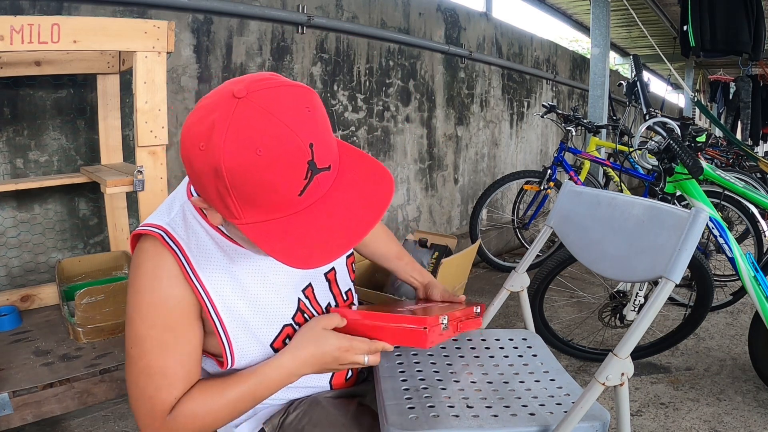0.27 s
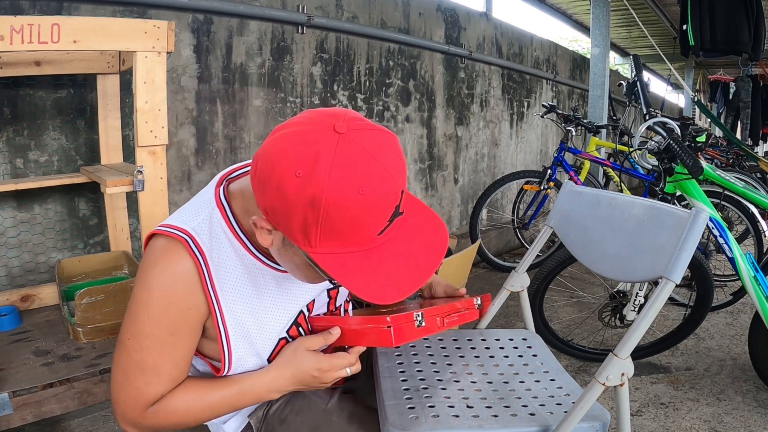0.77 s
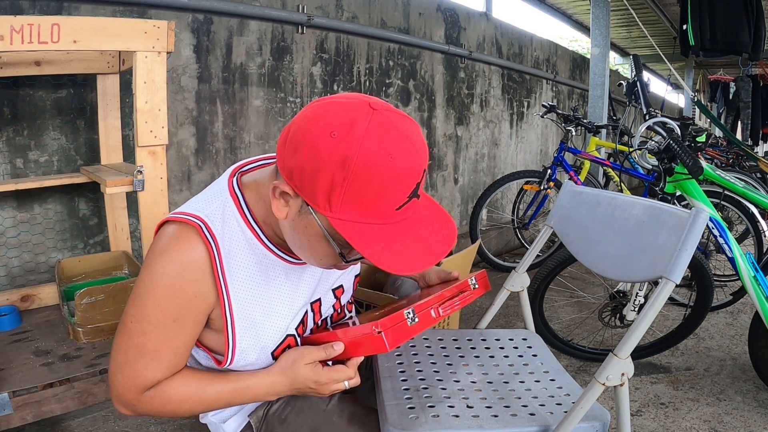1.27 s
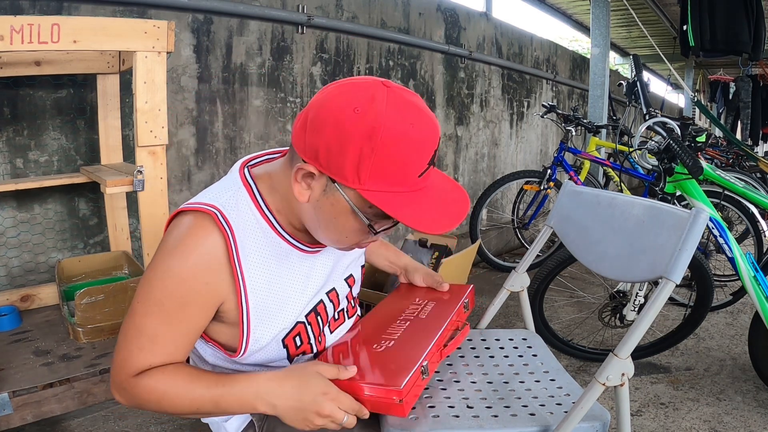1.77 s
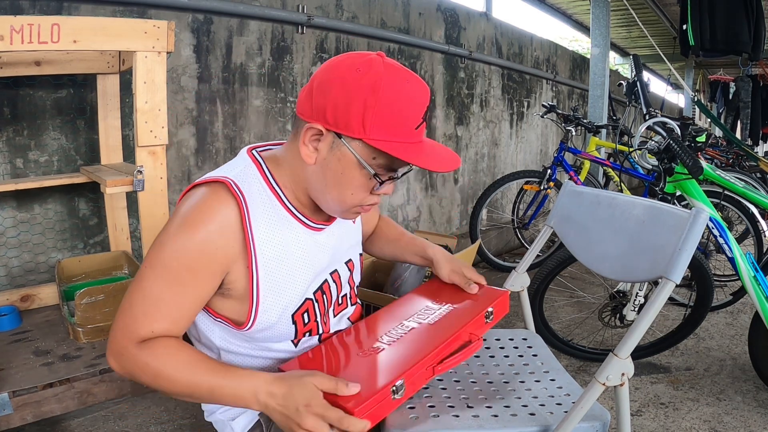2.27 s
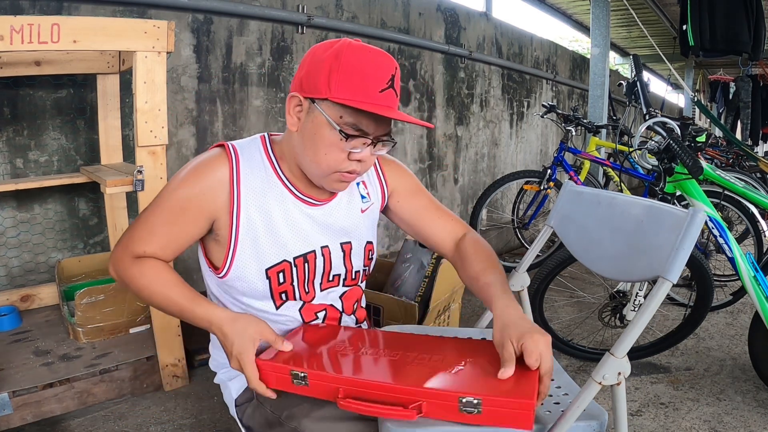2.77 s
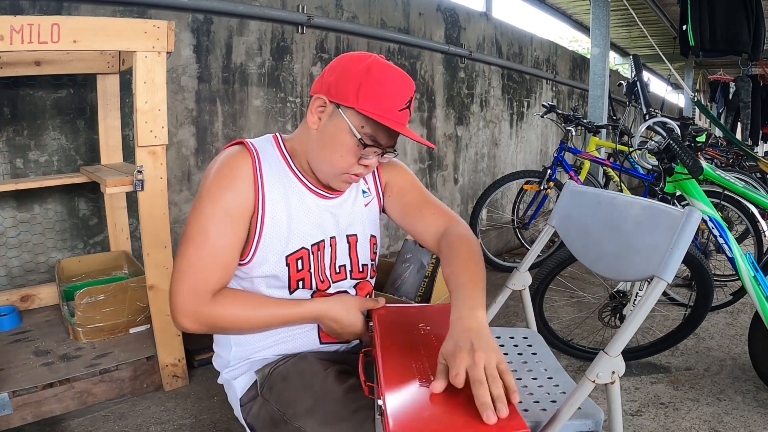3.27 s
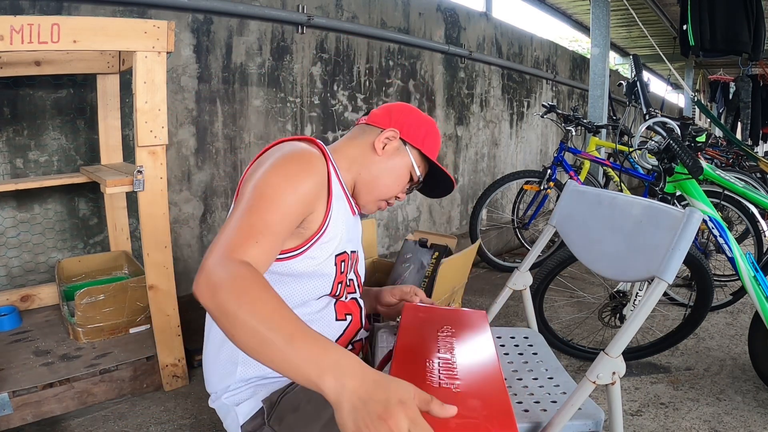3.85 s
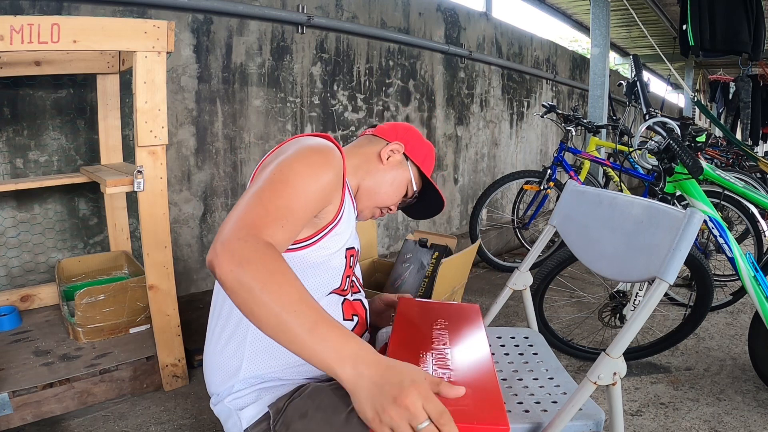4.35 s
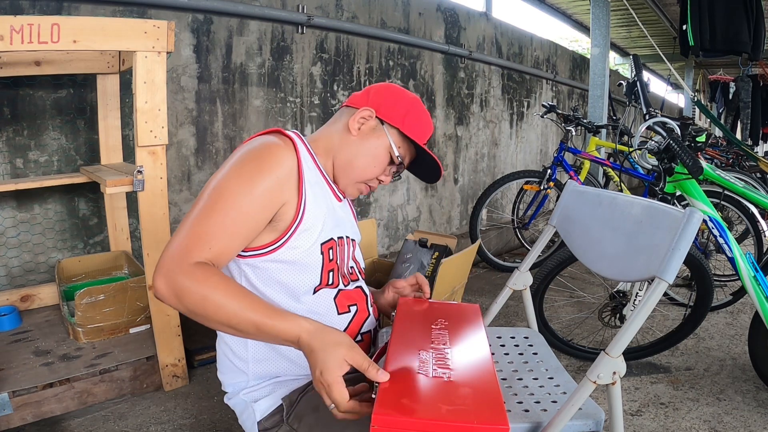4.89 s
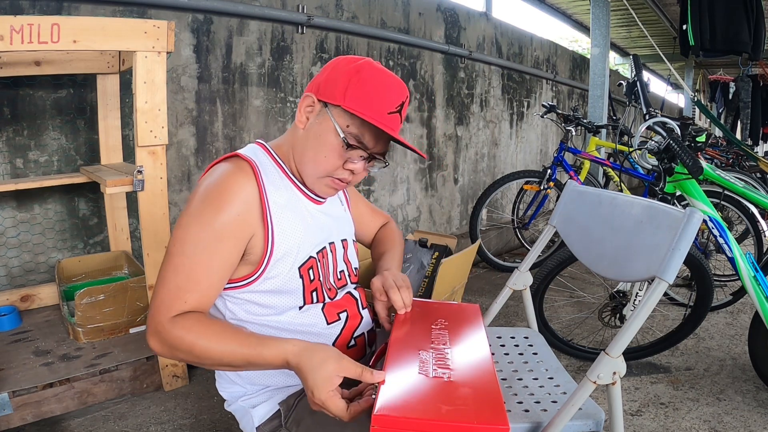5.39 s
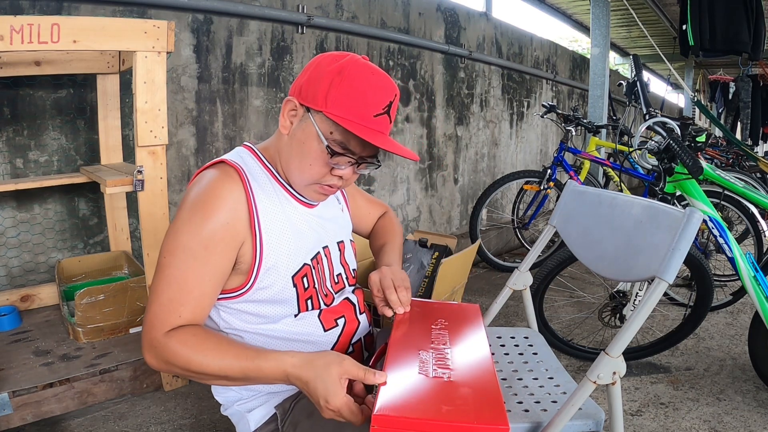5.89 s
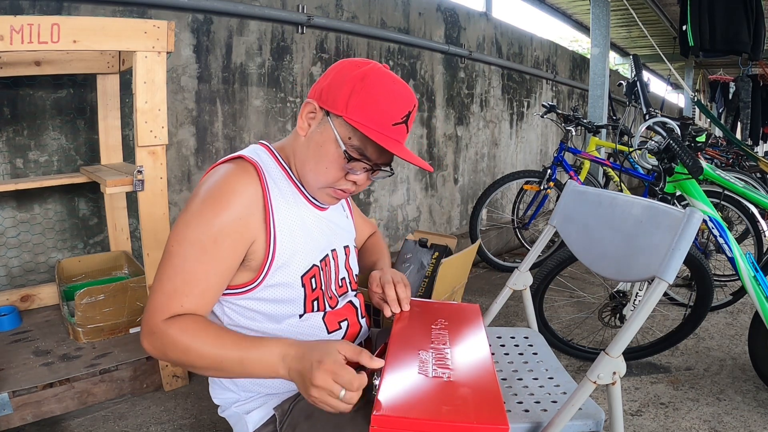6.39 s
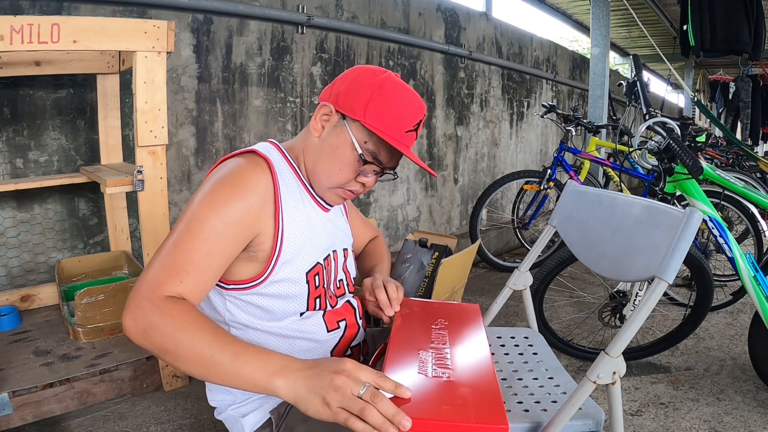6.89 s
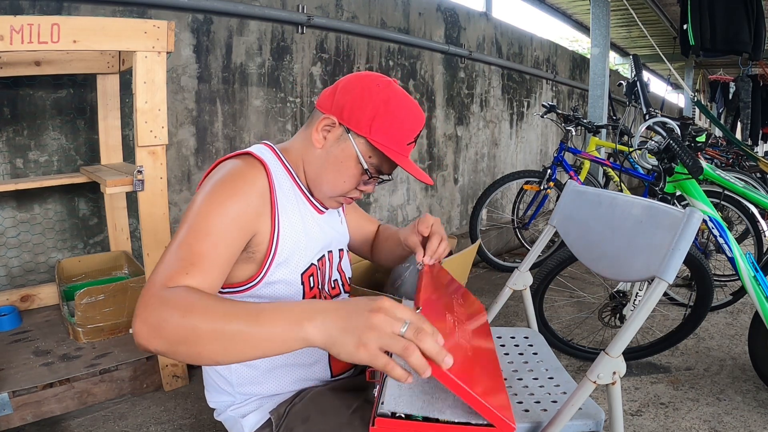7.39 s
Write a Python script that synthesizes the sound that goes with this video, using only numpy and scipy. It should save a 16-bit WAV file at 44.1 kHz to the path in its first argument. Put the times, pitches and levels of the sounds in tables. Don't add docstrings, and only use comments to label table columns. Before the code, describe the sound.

A close stereo recording in a covered outdoor space, with a short, dull roof tail. A low machine hum near the bottom of hearing booms and fades irregularly throughout, over soft distant wash. At 0.1-0.3 s sockets jolt in a thin metal case with a click and hollow thud. Mostly hum follows until a loud, bright clatter at 1.54 s with quick rattles after it, then another heavy, hollow clack at 2.12 s and small taps near 2.4 s. From 2.7 to 3.3 s the case lands on a plastic seat, scraping and thudding, with short low grunts around 3.05-3.15 s. A sharp ringing clack comes at 3.49 s. Faint taps and low drags occupy 3.9-4.4 s, then a lull with one tiny squeak. Latches snap at 5.68 and, harder, 5.99 s, trailed by a soft slide. Duller lid knocks sound at 6.85-6.95 s, a faint squeak at 7.2 s and a light tap at 7.5 s.

```python
import sys
import numpy as np
from scipy import signal
from scipy.fft import rfft, irfft
from scipy.io import wavfile
from scipy.ndimage import uniform_filter1d

SR = 44100
rng = np.random.default_rng(int(sys.argv[2]) if len(sys.argv) > 2 else 0)


def elevation(decibels):
    levels = np.asarray(decibels, float)
    return 10 ** (levels / 20)


def transcribe(signal):
    frames = np.atleast_2d(signal).T
    limited = np.clip(frames, -1, 1)
    pcm = np.round(limited * 32767).astype(np.int16)
    wavfile.write(sys.argv[1], SR, pcm)


N = 336924
T = np.arange(N) / SR

# t/s, peak level/dB,
# hardness [0-1], lid f/Hz, chatter t60/s
BLOWS = [(0.122, -31, .05, 400, .25), (0.204, -16, 0.47, 648, 0.13), (0.219, -32.5, 0.79, 358, 0.2),
         (0.27, -36, 0.1, 415, 0.37), (0.305, -30, .15, 406, 0.17), (1.54, -12.5, 0.38, 505, 0.23),
         (1.581, -19.5, 0.36, 620, 0.3), (1.619, -21.5, 0.2, 700, 0.18), (1.647, -29, 0.1, 500, 0.28),
         (2.121, -19.5, 0.55, 400, 0.31), (2.139, -32, 0.84, 460, 0.2), (2.52, -39, .62, 374, 0.32),
         (2.741, -33, 0.15, 400, .4), (2.757, -33, .35, 420, 0.28), (2.829, -36, .6, 283, .21),
          (2.941, -31, 0.3, 468, 0.4), (3.316, -23.5, .15, 567, 0.48), (3.369, -32, 0.4, 383, 0.24),
          (3.469, -33.5, 0.99, 335, 0.32), (3.484, -26.5, 0.98, 450, 0.21), (3.517, -24, 0.76, 380, 0.32),
          (3.92, -31.5, 0.42, 510, 0.27), (4.145, -34, .1, 470, .2), (4.277, -36, .42, 463, 0.25),
          (4.339, -27.5, 0, 285, 0.062), (5.675, -23.5, .57, 560, 0.19), (5.987, -16.5, 0.63, 520, .27),
          (6.015, -23, 0.52, 560, .15), (6.081, -26.5, 0.2, 496, .25), (6.844, -26, 0, 464, 0.25),
          (6.878, -38, .55, 460, .3), (6.948, -23.5, 0.2, 318, 0.29)]
SOFT_BOOM_DB, HARD_BOOM_DB = 5, -4
SOFT_SHINE_DB, HARD_SHINE_DB = -48, 3
SOFT_CRUNCH_DB = -8


def knocks(chatter):
    drive, boom, bright, grip, crunch = np.zeros((5, N + SR))
    t = T[:SR // 2]
    for s, db, hard, hz, t60 in BLOWS:
        start = int((s - .002) * SR)
        blow = slice(start, start + len(t))
        boom_db = SOFT_BOOM_DB + (HARD_BOOM_DB - SOFT_BOOM_DB) * hard
        bright_db = SOFT_SHINE_DB + (HARD_SHINE_DB - SOFT_SHINE_DB) * hard
        settle = np.exp(-(t / (0.11 * np.clip(t60, .03, .5))) ** 1.205)
        shake = settle * np.minimum(t / 0.0021, 1)
        force = elevation(db - 8.5) * shake * np.resize(chatter[start:], len(t))
        drive[blow] += force
        crunch[blow] += elevation(SOFT_CRUNCH_DB * (1 - hard) + 4) * force
        boom[blow] += elevation(boom_db + 1) * force
        bright[blow] += elevation(bright_db + 13.5) * force
        grip[blow] += elevation(boom_db - 21) * ring(force, hz, .035)
    return case(drive[:N], boom[:N], bright[:N], crunch[:N]) + grip[:N]


# f/Hz, level/dB, t60/s
LID = [(235, -12, .08), (300, -4, .1), (366, 0, .09), (400, -4, .07), (458, -1, .08), (530, -6, .07),
       (610, -7, .06), (690, -6, .07), (790, -10, .06), (930, -8, .08), (1010, -9, .08)]
# f/Hz, level/dB per Hz
CLATTER = [(300, -34.5), (500, 3), (750, 4.5), (960, 7.5), (1300, 0.5), (2000, -4), (3000, -10),
           (4200, -20.5), (6000, -32), (11000, -56)]
# f/Hz, level/dB per Hz
SHINE = [(2350, -5.5), (4000, -4), (10000, -21), (10900, -29), (12000, -27), (14500, -39), (15200, -43),
         (15700, -50)]
# f/Hz, level/dB per Hz
CRUNCH = [(700, -29.5), (1500, -2.5), (2600, 0), (3800, -2), (5500, -20), (12000, -50)]
CRUNCH_DB = -13


def case(drive, boom, bright, crunch):
    sound = level_colour(drive, CLATTER)
    sound += signal.fftconvolve(boom, body(LID, longest_s=0.065))[:N]
    sound += elevation(CRUNCH_DB) * level_colour(crunch, CRUNCH)
    return sound + level_colour(bright, SHINE)


# t/s, peak level/dB, centre f/Hz, t60/ms
TICKS = [(.12, -36, 2700, 7.9), (0.203, -24, 2660, 4.3), (.204, -26, 3600, 1.9), (0.2192, -23.5, 3280, 3),
         (1.541, -10, 2610, 2.9), (1.5405, -13, 4600, 1.2), (1.581, -19, 1700, 3), (2.119, -27, 2800, 4.4),
         (2.441, -31.5, 2780, 5.1), (2.525, -38, 2960, 13), (2.741, -29, 2600, 5), (2.826, -33.5, 3439, 8),
         (2.825, -48, 7620, 10), (2.943, -26.5, 3930, 10.5), (2.943, -38, 7550, 12), (3.47, -30, 2995, 6.9),
         (3.487, -15, 4030, 19), (5.6752, -24, 5030, 8.8), (5.99, -19.5, 2080, 8), (6.844, -34, 2187, 5.6),
         (6.947, -36.5, 3220, 23), (6.947, -30, 1580, 15.2)]
# t/s, peak level/dB, panel f/Hz
THUDS = [(.205, -15.5, 426), (.129, -28, 400), (.311, -27, 430), (3.495, -21, 430), (.122, -32, 1050),
         (6.845, -22, 500), (5.998, -19, 421), (1.479, -32.5, 1000), (1.544, -23, 520), (2.121, -13, 525),
         (2.392, -24.5, 930), (2.442, -31, 460), (3.316, -25.5, 588), (3.92, -27.5, 1130),
         (4.273, -28, 1080), (5.6675, -26.5, 451), (6.082, -28, 1200), (6.758, -38, 1225),
         (6.955, -28, 1040), (6.952, -24.5, 470), (7.075, -38, 895), (7.52, -31, 1100), (1.581, -21, 980),
         (2.75, -27, 1400), (2.123, -19.5, 1000), (2.953, -27, 510), (2.982, -24, 530), (2.999, -26, 520),
         (3.014, -25, 490), (3.13, -24, 540), (3.145, -23, 520), (3.205, -30, 450), (2.95, -30, 1750),
         (3.938, -33, 1100), (4.276, -33, 490), (.232, -27, 450), (3.5, -22, 480), (2.743, -28, 400)]
THUD_CYCLES = 18


def taps():
    out, t = np.zeros(N + SR), T[:SR // 3]
    events = TICKS + [(s, db, hz, THUD_CYCLES / hz * 1000) for s, db, hz in THUDS]
    for s, db, hz, t60_ms in events:
        scuff = rng.standard_normal(len(t)) * np.exp(-t / .00035)
        tick = ring(scuff, hz, t60_ms / 1000)
        tick = ring(ring(tick, hz, 1.1 / hz), hz, 1.1 / hz)
        out[int(s * SR):][:len(t)] += elevation(db) * tick / np.max(np.abs(tick))
    return out[:N]


# t/s, peak
# level/dB, f/Hz, t60/s
RINGS = [(0.222, -41, 5100, 0.3), (0.22, -39.5, 5360, 0.15), (0.205, -35, 2310, 0.12),
         (0.16, -62, 5300, 0.2), (1.585, -44, 7820, 0.06), (1.64, -49.5, 5100, 0.3),
         (1.585, -25.5, 940, 0.3), (2.17, -47.5, 5150, 0.4), (2.125, -35, 2850, 0.13),
         (2.13, -53, 13000, 0.1), (2.14, -36, 5000, .12), (2.12, -34, 1900, .12), (3.5, -51, 5090, 0.3),
         (3.6, -59.5, 9980, 0.06), (3.5, -30.5, 5700, 0.25), (3.49, -28, 2196, 0.18),
         (3.51, -31, 3550, 0.2), (3.485, -22, 720, 0.3), (5.68, -21.5, 1740, 0.06), (5.676, -34, 1520, .1),
         (5.66, -40, 1550, .1), (5.685, -31, 1750, .05), (5.69, -39, 3450, .1), (5.675, -30, 2800, .06),
         (5.68, -29, 2750, 0.1), (5.682, -34, 3300, 0.1), (5.678, -40, 5100, 0.08), (5.66, -29, 540, 0.25),
         (5.988, -38, 9980, 0.1), (6.02, -46, 9980, 0.14), (6.025, -46, 5350, 0.25),
         (6.015, -45, 7930, 0.08), (5.99, -35, 2770, 0.17), (5.985, -31, 2100, .2),
         (5.995, -24.5, 540, 0.2), (6.0, -26, 690, 0.17), (6.85, -31, 560, 0.15),
         (1.55, -34, 1700, .3), (1.57, -27, 350, .3), (1.66, -31, 1000, .15), (1.545, -40, 3300, .15),
          (1.625, -36, 1550, .1), (1.6, -41, 2500, .2), (2.72, -34, 1250, .25), (2.748, -36, 2650, .06),
          (2.77, -34, 950, .2), (2.88, -41, 1050, .15), (2.995, -31, 1000, .15), (2.985, -40, 1750, .15),
          (3.05, -33, 1150, .2), (3.1, -31, 1050, .25), (3.075, -37, 2400, .08), (3.483, -46, 14600, .1),
          (3.5, -48, 12500, .15), (2.14, -46, 12000, .1), (5.7, -36, 520, .4), (6.1, -33, 480, .2),
          (6.9, -36, 480, .4), (2.68, -36, 380, .3), (3.34, -47, 5300, .15), (3.08, -50, 5200, .3),
          (3.565, -37, 1000, .15), (.205, -36, 1700, .1), (.205, -29, 900, .12), (.206, -36, 3700, .12),
          (3.925, -36, 1550, .08), (4.15, -48, 2200, .08), (4.3, -41, 1600, .1)]
RING_T60_S, RING_T60_S_PER_KHZ = .012, .004


def rings(chatter):
    out, t = np.zeros(N + SR), T[:SR // 3]
    for s, db, hz, t60 in RINGS:
        feed = elevation(-75 * t / t60) * chatter[int(s * SR):][:len(t)]
        tone = ring(feed, hz, RING_T60_S + RING_T60_S_PER_KHZ * hz / 1000)
        out[int(s * SR):][:len(t)] += elevation(db + 4.5) * tone / np.max(np.abs(tone))
    return out[:N]


# start t/s, length t/s, scrape level/dB, panel drone level/dB, grit level/dB
SLIDES = [(2.679, 0.081, -44, 0, -5), (2.731, .11, -36, 4, -15), (2.847, 0.12, -43, 2, -7.5),
          (2.936, 0.031, -39, -1, -5), (2.953, .11, -35, -1, -22), (3.001, .21, -33.5, 2.5, -22),
          (3.06, .15, -48, 0, -3), (3.194, 0.067, -52, 11, -5), (3.305, .05, -38.5, 11.5, -16),
          (3.329, 0.073, -48, 10, 5), (4.028, .2, -48, 16, -19), (4.279, .15, -52.5, 15.5, -15),
          (5.654, .03, -42, 4, -7), (6.104, 0.27, -56.5, 14, -18)]
SLIDE_RISE, SLIDE_FALL = 0.33, 0.49


def slides():
    scrape, drone, grit = np.zeros((3, N))
    for s, length, db, drone_db, grit_db in SLIDES:
        push = elevation(db) * swell(s, length, SLIDE_RISE, SLIDE_FALL) ** 2
        scrape += push
        drone += push * elevation(drone_db - 11)
        grit += push * elevation(grit_db)
    rub = grains(rate=6000, spread_db=1.8) * elevation(.9 * walk(90))
    return case(scrape * rub, drone * rub, grit * rub, elevation(-4) * scrape * rub)


# start t/s, length t/s, lower mode level/dB, upper mode level/dB
GROAN = [
    (2.97, 0.097, -39, -37),
    (3.052, 0.032, -19.5, -20),
    (3.085, .035, -16, -20.5),
    (3.122, .035, -32, -24.5),
    (4.043, .11, -31, -39),
    (4.271, 0.023, -37, -36.5),
    (4.3, .07, -45.5, -45),
]
# f/Hz, driver [1 lower, 2 upper], level/dB
GROAN_MODES = [(450, 1, 0), (530, 2, -1), (764, 1, -16), (1040, 2, -18), (330, 1, -15)]
GROAN_RISE, GROAN_FALL = 0.19, 0.5


def groan():
    out = np.zeros(N)
    for hz, driver, db in GROAN_MODES:
        phase = 2 * np.pi * np.cumsum(hz * (1 + .028 * walk(70))) / SR
        tone = np.sqrt(2) * elevation(db + 2.6 * walk(90)) * np.sin(phase)
        for s, length, lower_db, upper_db in GROAN:
            slip_db = lower_db if driver == 1 else upper_db
            out += elevation(slip_db) * swell(s, length, GROAN_RISE, GROAN_FALL) * tone
    return out


# t/s, peak level/dB, f/Hz
CHIRPS = [
    (7.171, -49, 3170),
    (6.885, -55, 5120),
    (6.19, -59, 5400),
    (4.785, -53, 3700),
]


def chirps():
    out = np.zeros(N)
    waver = np.cumsum(1 + .012 * walk(150)) / SR
    for s, db, hz in CHIRPS:
        pulse = np.exp(-((T - s - .015) / .014) ** 2)
        out += elevation(db - 1.5) * pulse * np.sin(2 * np.pi * hz * waver)
    return out


# f/Hz, level/dB
NEAR_TONE = [(60, -30), (200, -3), (280, 0)]


def handled_case():
    chatter = grains(rate=8000, spread_db=1.9) * elevation(1.1 * walk(100))
    sources = knocks(chatter) + taps() + rings(chatter) + slides() + groan() + chirps()
    return colour(sources, NEAR_TONE)


# f/Hz, level/dB
ROOF_TONE = [(300, 3), (3000, 1.5), (8000, -6.5), (14000, -22)]
ROOF_T60_S, ROOF_DB = 0.28, -8


def under_roof(near):
    return near + elevation(ROOF_DB) * colour(moving(near, ROOF_T60_S, 25), ROOF_TONE)


def moving(x, t60, turn):
    return np.cos(turn * T) * roof(x, t60) + np.sin(turn * T) * roof(x, t60)


def roof(x, t60):
    t = T[:SR // 2]
    h = rng.standard_normal(len(t)) * elevation(-60 * t / t60)
    return signal.fftconvolve(x, h / np.linalg.norm(h))[:N]


# start t/s, length t/s, level/dB
SWELLS = [(-.05, 0.42, -29.5), (0.265, 0.23, -22.5), (0.487, 0.3, -24), (0.839, 0.11, -23),
          (0.976, 0.31, -24.5), (1.333, .55, -21), (1.793, 0.42, -19), (2.21, 0.14, -25),
          (2.555, 0.24, -25.5), (2.854, 0.16, -27), (2.997, 0.44, -24), (3.451, 0.29, -25),
          (3.817, 0.17, -23.5), (4.04, 0.27, -28.5), (4.297, 0.23, -22.5), (4.597, 0.28, -25),
          (4.892, 0.14, -25.5), (5.1, 0.16, -27.5), (5.32, 0.27, -27), (5.706, 0.081, -25.5),
          (5.788, 0.31, -24), (6.08, 0.081, -27), (6.197, 0.55, -20.5), (6.692, 0.26, -23),
          (6.998, 0.19, -23), (7.174, 0.29, -22.5), (7.429, .15, -20.5), (7.552, .11, -24)]
# f/Hz, width f/Hz, level/dB
MOTOR = [(57.9, 7.6, -39), (112.3, 12, -37), (150.6, 11, -42), (173.5, 12, -38.5), (255.3, 35, -47.5),
         (700.7, 12, -60), (938, 110, -60.5), (3150, 170, -66.5)]
HUM_HZ, HUM_FLOOR_DB, HUM_RISE, HUM_FALL = 93.9, -36, .35, 0.38
SHAFT_HZ, SHAFT_DB = 24.8, -37.5


def hum():
    boom = elevation(HUM_FLOOR_DB)
    for s, length, db in SWELLS:
        boom = boom + elevation(db) * swell(s, length, HUM_RISE, HUM_FALL)
    phase = 2 * np.pi * np.cumsum(HUM_HZ + 2.1 * walk(20)) / SR
    out = np.sqrt(2) * boom * elevation(2.2 * walk(18) - 3) * np.sin(phase)
    out += np.sqrt(2) * elevation(SHAFT_DB + .6 * walk(3)) * np.sin(2 * np.pi * SHAFT_HZ * T)
    for hz, width, db in MOTOR:
        out += elevation(db) * unit(ring(rng.standard_normal(N), hz, 3.1 / width))
    return out


# f/Hz, level/dB per Hz
WASH = [(20, -12), (45, -10), (75, 5.5), (130, -9.5), (220, -18), (320, -19.5), (600, -27.5), (1200, -31),
        (2500, -39.5), (5000, -45.5), (7000, -54), (10000, -69.5), (14000, -81.5), (16000, -95)]
WASH_DB = -31.5


def wash():
    return elevation(WASH_DB) * unit(colour(rng.standard_normal(N), WASH)) * elevation(0.89 * walk(1.5))


# f/Hz, side minus mid level/dB
NEAR_WIDE = [(60, -32), (110, -33), (200, -30), (380, -25), (700, -14), (1290, -14), (2380, -9), (4390, -3),
             (8110, -1), (15000, 1)]
# f/Hz, side minus mid level/dB
WIDE = [(60, -28), (110, -29), (200, -23), (380, -16), (700, -10), (1290, -7), (2380, -4), (4390, -2),
        (8110, -1), (15000, -1)]


def ports(near, drone):
    mid = near + drone + wash()
    side = colour(moving(near, .04, 40), NEAR_WIDE)
    side = side + colour(wash() + .6 * roof(drone, .3), WIDE)
    side = side + .03 * mid - .05 * near - .5 * np.gradient(drone)
    return np.array([mid + side, mid - side])


def unit(x):
    return x / np.sqrt(np.mean(x ** 2))


def colour(x, points):
    hz, db = np.transpose(points)
    bins = np.arange(1025) * SR / 2048
    log_gain = np.log(elevation(np.interp(np.log(bins + 1), np.log(hz), db)))
    ceps = irfft(log_gain)
    ceps[1:1024] *= 2
    ceps[1025:] = 0
    return signal.fftconvolve(x, irfft(np.exp(rfft(ceps))))[:len(x)]


def level_colour(x, points):
    click = np.eye(1, 4096)[0]
    return colour(x, points) / np.linalg.norm(colour(click, points))


def ring(x, hz, t60):
    pole = np.exp(2j * np.pi * hz / SR - np.log(1000) / (max(t60, .002) * SR))
    return signal.lfilter([1], [1, -pole], x).imag


def body(modes, longest_s, size=16384):
    click = np.eye(1, size)[0]
    h = sum(elevation(db) * ring(click, hz, min(t60, longest_s)) for hz, db, t60 in modes)
    return h / np.linalg.norm(h)


def walk(rate):
    k = int(SR / rate)
    held = np.repeat(rng.standard_normal(N // k + 1), k)
    return unit(uniform_filter1d(uniform_filter1d(held, k), k)[:N])


def grains(rate, spread_db):
    hit = rng.random(N) < rate / SR
    size = rng.exponential(size=N)
    sign = rng.standard_normal(N)
    return unit(hit * elevation(spread_db * size) * sign)


def swell(s, length, rise, fall):
    u = (T - s) / max(length, .01)
    return np.sin(np.pi / 2 * np.clip(np.minimum(u / rise, (1 - u) / fall), 0, 1))


def scene():
    return ports(under_roof(handled_case()), hum())


def top_cut(x):
    return signal.sosfilt(signal.butter(12, 15570, fs=SR, output="sos"), x)


def record(dry):
    soft = np.tanh(1.7 * dry) / 1.7
    low_pass = signal.ellip(6, .3, 50, 15400, fs=SR, output="sos")
    return top_cut(signal.sosfilt(low_pass, soft))


dry = scene()
out = record(dry)
transcribe(out)
```